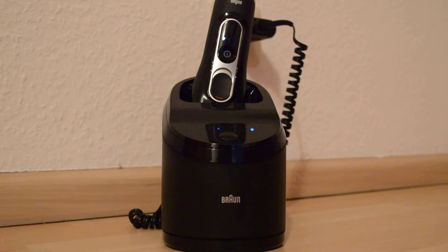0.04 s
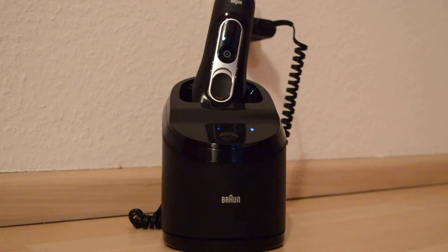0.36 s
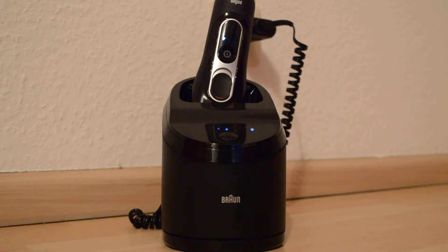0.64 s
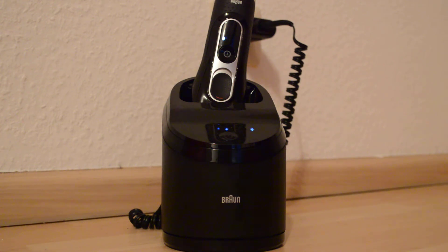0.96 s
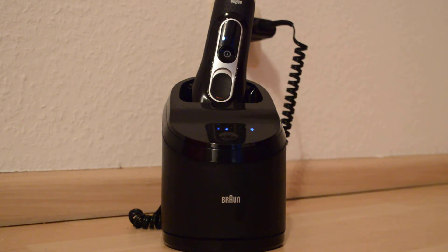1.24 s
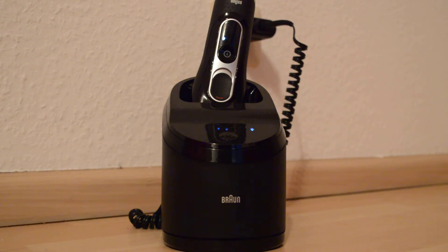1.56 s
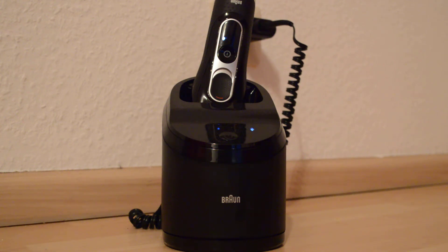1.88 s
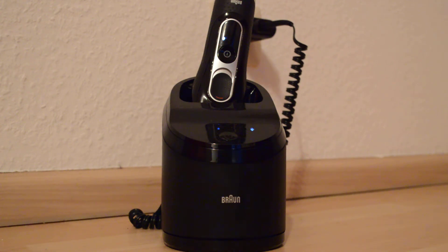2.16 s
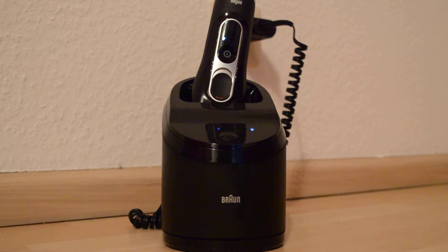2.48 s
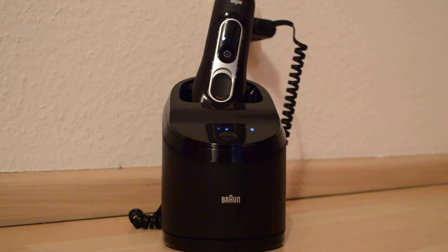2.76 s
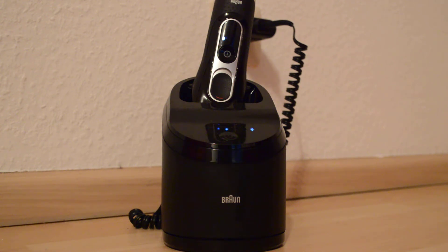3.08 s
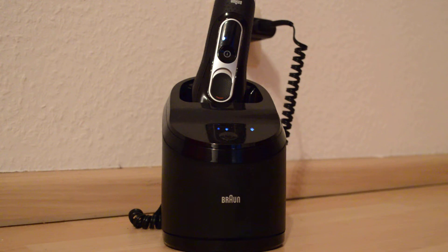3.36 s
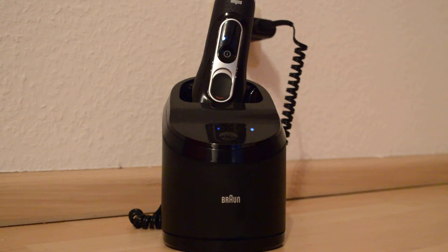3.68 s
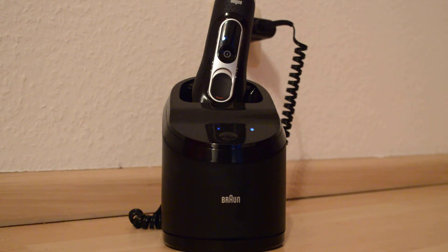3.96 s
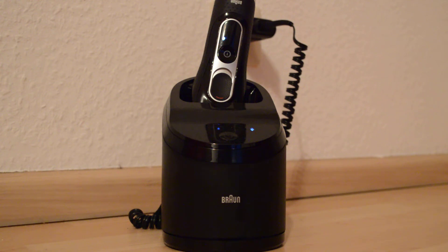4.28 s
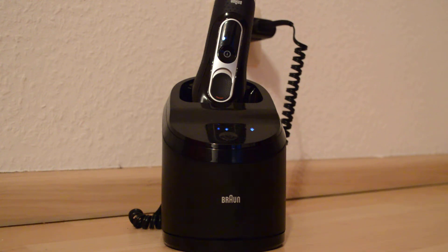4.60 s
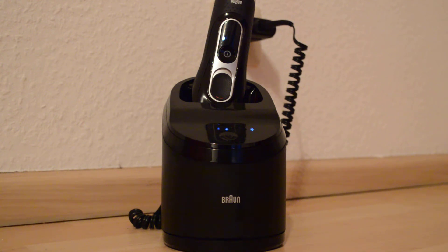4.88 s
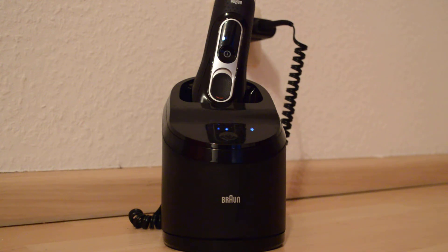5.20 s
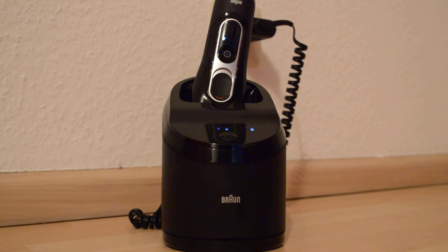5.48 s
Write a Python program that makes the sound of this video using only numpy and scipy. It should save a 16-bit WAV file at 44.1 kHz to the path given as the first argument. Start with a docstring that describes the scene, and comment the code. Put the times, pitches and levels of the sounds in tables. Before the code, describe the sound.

An electric shaver buzzes loudly in its cleaning station, with a raspy, hissing edge and a little churning fluid. After about two seconds it switches off with a brief rattle and a short ring from the housing. The station's pump carries on much more quietly, a steady hum with a fine high bearing squeak and a thin electronic whine. A faint low room rumble lies underneath.

```python
"""An electric shaver buzzes in its cleaning station on a wooden floor. Its cutter, stroking 127 times
a second, drives the housing into forced vibration, scrapes the foil and churns the fluid.
Switched off, it rattles to rest and the housing rings briefly. The station's pump, running throughout,
hums on with a squeaking bearing and a thin electronic whine, over the low rumble of the room."""
import sys
import numpy as np
from scipy.fft import rfft, irfft, next_fast_len
from scipy.io import wavfile
from scipy.ndimage import uniform_filter1d, map_coordinates

SR = 44100
rng = np.random.default_rng(int(sys.argv[2]) if len(sys.argv) > 2 else 0)


def materialize(psi):
    """Save the field psi as 16-bit PCM at rate SR to the path in sys.argv[1].

    A 1-D psi becomes a single channel; in a 2-D psi each row is a channel.
    """
    bounded = np.clip(np.atleast_2d(psi).T, -1, 1)
    quanta = np.round(bounded * 32767).astype(np.int16)
    wavfile.write(sys.argv[1], SR, quanta)


N = 244314
OFF_S = 2.236  # the shaver's power is cut
FREE_HZ, LOADED_HZ = 127.6, 126.8  # stroke rate without drag and under full drag
TOP_HZ = 15760  # upper band limit


def shaver():
    """Periodic excitation: one stroke cycle, slowed by drag, times all the sounds of the cutter."""
    load = fluid_drag()
    stroke_hz = FREE_HZ + (LOADED_HZ - FREE_HZ) * load
    turns = np.cumsum(stroke_hz) / SR
    body = housing_buzz(turns, load) + head_rasp(turns, load) + fluid_churn(turns, load)
    treble = foil(turns, load, np.mean(stroke_hz))
    return body * switch_off(t60=0.62, echo_db=-6.5) + treble * switch_off(t60=0.29, echo_db=-2.5)


def fluid_drag(first_load=0.6, build_s=0.908):
    """Fluid resistance loads the cutter, from 0 (free) to 1 (full drag)."""
    # The cutter runs nearly free. Each row: start in seconds, length in seconds, share of drag lost.
    slacks = [(-0.1, 0.19, 0.62), (0.295, 0.42, 0.82), (2.01, 0.5, 0.871)]
    slack, = swells(slacks, ramp_s=0.0989)
    build_up = np.interp(clock(), [0, build_s], [first_load, 1])
    return np.clip(build_up * (1 - slack), 0, 1)


def housing_buzz(turns, load, free_db=-27, drag_gain_db=2):
    """Forced vibration: the housing sounds harmonics of the stroke rate, whose balance shifts with drag."""
    # Spectra under light and heavy drag. Each row: harmonic number, relative level in dB.
    light_harmonics = [(1, -17), (2, -17), (3, -20), (4, -8), (5, -10), (6, -26), (7, -9), (8, -8), (9, -3),
                       (10, -7), (11, -16), (12, -10), (13, -15), (14, -8), (15, -5), (16, -18), (17, 0),
                       (18, -11), (19, -7), (20, -5), (21, -19), (22, -11), (23, -18), (24, -22), (25, -22),
                       (26, -22), (27, -22), (28, -22), (29, -20)]
    heavy_harmonics = [(1, -20), (2, -23), (3, -21), (4, -14), (5, -11), (6, -25), (7, -5), (8, -2),
                       (9, -10), (10, -14), (11, -12), (12, -16), (13, -21), (14, -15), (15, -10),
                       (16, -25), (17, 0.7), (18, -14), (19, -9), (20, -12), (21, -17), (22, -16),
                       (23, -21), (24, -17), (25, -17), (26, -23), (27, -24), (28, -28), (29, -20)]
    heavy_share = np.interp(load, [0.23, 0.76], [0, 1])
    unsteady_turns = turns + 0.00084 * wobble(82)
    tone = np.zeros(N)
    for (order, light_db), (_, heavy_db) in zip(light_harmonics, heavy_harmonics):
        level_db = light_db + heavy_share * (heavy_db - light_db) + 0.93 * wobble(5)
        tone += amp(level_db) * np.sin(2 * np.pi * (order * unsteady_turns + rng.random()))
    running_rms = np.sqrt(np.abs(uniform_filter1d(tone ** 2, SR // 10)))
    return amp(free_db + drag_gain_db * load) * tone / running_rms


def head_rasp(turns, load):
    """Amplitude modulation: the noise of the head and the sloshing fluid pulses twice a stroke."""
    # The rasp's spectrum. Each row: frequency in Hz, relative spectral density in dB.
    rasp_spectrum = [(1200, -33), (1700, -6), (2000, -12.5), (2330, 1), (2600, -1.5), (2900, -10),
                     (3700, -17.5), (6000, -40)]
    level_db = -36.5 - 0.9 * load + 1.5 * wobble(7.6)
    return amp(level_db) * noise(rasp_spectrum, 1 + 0.11 * np.cos(4 * np.pi * turns))


def fluid_churn(turns, load):
    """Flow noise: the cutter stirs the fluid in one uneven pulse a stroke."""
    # The churning's spectrum. Each row: frequency in Hz, relative spectral density in dB.
    churn_spectrum = [(100, -43), (300, -18.5), (700, -13), (1050, -6.5), (1250, -6.5), (1420, 1.5),
                      (1650, -16.5), (2200, -19), (4000, -41)]
    # The fluid surges and ebbs. Each row: start in seconds, length in seconds, level change in dB.
    surges = [(0.37, 0.28, 2), (1.26, 0.21, -1), (1.56, 0.27, -1.5)]
    surge_db, = swells(surges, ramp_s=0.041)
    pulses = (1 + 0.22 * np.sin(2 * np.pi * turns)) * amp(2.2 * wobble(30.25))
    return amp(-39 - 0.4 * load + surge_db) * noise(churn_spectrum, pulses)


def foil(turns, load, stroke_hz):
    """Friction and resonance: scraped on both halves of a stroke, the foil hisses, buzzes and rings."""
    # Overtones nearest the foil's resonances. Each row: frequency in Hz, relative level in dB.
    resonances = [(4694, -54), (4818, -58.5), (5200, -60), (5453, -62), (5959, -81), (6212, -51.5),
                  (6342, -51), (6465, -49), (6718, -55.5), (6848, -63), (6971, -52), (7607, -50),
                  (7989, -51), (8242, -52), (8877, -52.5), (10271, -54)]
    # Spectra of the contact buzz and the hiss. Each row: frequency in Hz, relative density in dB.
    contact_spectrum = [(3900, 2), (4300, -3.5), (5200, -1.5), (6300, -1), (8000, -11), (9500, -6),
                        (10300, -2.5), (11500, -22), (13000, -20), (15500, -43)]
    hiss_spectrum = [(2500, -25), (3300, -10.5), (4500, -10.5), (5100, -9), (5900, -4.5), (7200, -8),
                     (8200, -6.5), (9600, -10.5), (10400, -8.5), (11500, -12.5), (13000, -24), (15500, -44)]
    hiss_db = -39 - 0.87 * load
    ring_hz, ring_db = np.transpose(resonances)
    ring = cycle(turns + 0.00053 * wobble(51), ring_hz / LOADED_HZ, ring_db, rng.random(len(ring_hz)))
    ringing = amp(hiss_db - 10.5 + 6.4 * load + 2.3 * wobble(10.05)) * ring
    buzz = amp(hiss_db - 2) * comb(turns, stroke_hz, contact_spectrum, jitter_turns=0.001, jitter_rate=40)
    scrape = 1 + 0.4 * np.cos(4 * np.pi * turns) + 0.3 * np.cos(2 * np.pi * turns)
    hiss = amp(hiss_db) * noise(hiss_spectrum, scrape * amp(0.9 * wobble(150)))
    return ringing + buzz + hiss


def spurt(at_s=0.15, level_db=-39, t60=0.22, attack_s=0.004):
    """A noise transient: a little fluid spits through the foil."""
    t = time_since(at_s)
    spray = noise([(5500, -29), (7000, 0), (8300, 0), (10000, -25)])
    return amp(level_db - 60 * t / t60) * (1 - np.exp(-t / attack_s)) * spray


def switch_off(t60, echo_db):
    """Reverberant decay: once power is cut, the direct sound ends and the room's share dies away."""
    t = time_since(OFF_S)
    echo = amp(echo_db)
    return (1 - echo) * np.exp(-t / 0.0035) + echo * amp(-60 * t / t60)


def coasting(level_db=-30, slowing_s=0.193, t60=0.62, knock_t60=0.071):
    """Damped motion: without power the cutter knocks and rattles ever more slowly and softly."""
    # The rattle's spectrum. Each row: frequency in Hz, relative spectral density in dB.
    rattle_spectrum = [(80, -25), (200, -4), (300, 4), (500, -10), (950, 3), (1400, 2.5), (1800, -6),
                       (2300, -0.5), (3300, -11.5), (10000, -20), (14000, -42)]
    # The cutter's last knocks. Each row: start in seconds, level in dB.
    last_knocks = [(2.243, -30), (2.281, -38)]
    t = time_since(OFF_S)
    turns = FREE_HZ * slowing_s * (1 - np.exp(-t / slowing_s))
    pulses = 1 + 0.12 * np.cos(2 * np.pi * turns)
    rattle = amp(level_db - 60 * t / t60) * (1 - np.exp(-t / 0.01)) * pulses
    knocks = sum(amp(db - 60 * time_since(at_s) / knock_t60) * (clock() > at_s)
                 for at_s, db in last_knocks)
    return (rattle + knocks) * noise(rattle_spectrum)


def housing_ring(attack_s=0.006, waver_rad=0.58):
    """Free vibration: the jolt of the stop excites the housing's modes, which decay exponentially."""
    # Each row: frequency in Hz, level in dB, time to fall by 60 dB in seconds.
    modes = [(891, -36, 0.29), (1023, -41.5, 0.25), (2190, -36, 0.35), (2275, -38.5, 0.42)]
    t = time_since(OFF_S)
    ring = np.zeros(N)
    for hz, db, t60 in modes:
        phase = 2 * np.pi * (hz * t + rng.random()) + waver_rad * wobble(40)
        ring += amp(db - 60 * t / t60) * unit(np.sin(phase))
    return ring * (1 - np.exp(-t / attack_s))


def pump(rotation_hz=84.85, hum_db=-43, wash_db=-50.3):
    """Rotating machinery: the motor hums at harmonics of its speed; fluid washes through twice a turn."""
    # The motor's hum. Each row: harmonic number, relative level in dB.
    hum_harmonics = [(1, -8.5), (2, -7), (3, -10), (4, -20), (5, -12), (6, 0), (7, -12.5), (8, -22),
                     (9, -10.5), (10, -0.5), (11, -14), (12, 4), (13, -42), (14, -15.5), (15, -14),
                     (16, -8), (17, -13.5), (18, 3), (19, -9.5), (20, -5.5), (21, 0), (22, -5.5), (23, -13),
                     (24, -3.5), (25, -15.5), (26, -6), (27, -12), (28, -9), (29, -17), (30, -3.5),
                     (31, -7), (32, -12.5), (33, -5), (34, -13), (35, -18), (36, -9.5)]
    # The flow's spectrum. Each row: frequency in Hz, relative spectral density in dB.
    wash_spectrum = [(120, -25), (220, 0), (1100, 0), (1400, -3), (1900, 0), (2400, -6), (4400, -8),
                     (5200, -13), (7000, -15), (11000, -13), (13000, -19), (15500, -20)]
    turns = np.cumsum(rotation_hz * (1 + 0.00034 * wobble(10))) / SR
    orders, levels_db = np.transpose(hum_harmonics)
    hum_gain = amp(hum_db + 0.46 * wobble(12))
    hum = hum_gain * cycle(turns + 0.0011 * wobble(60), orders, levels_db, rng.random(len(orders)))
    brushes = brush_buzz(turns, rotation_hz)
    wash = amp(wash_db) * noise(wash_spectrum, 1 + 0.3 * np.cos(4 * np.pi * turns))
    return hum + brushes + wash + bearing_squeak(turns)


def brush_buzz(turns, rotation_hz, level_db=-49.5):
    """Sliding contact: the motor's brushes buzz, pressing harder on one side of each turn."""
    # The brushes' spectrum. Each row: frequency in Hz, relative spectral density in dB.
    brush_spectrum = [(3100, -3.5), (3400, -3), (4700, 2.5), (5100, -7.5), (5500, -5.5), (6400, -6),
                      (7400, -11), (7950, -1.5), (8300, -15), (9100, 3), (9500, -11), (10400, -4),
                      (11800, -9.5), (12900, -23), (13600, -15), (14100, -27), (15500, -32)]
    pressure = 1 + 0.25 * np.cos(2 * np.pi * turns) + 0.027 * np.sin(4 * np.pi * turns)
    contacts = comb(turns, rotation_hz, brush_spectrum, jitter_turns=0.0006, jitter_rate=30)
    return amp(level_db + 0.72 * wobble(20)) * unit(pressure * contacts)


def bearing_squeak(turns, level_db=-49.5, harmonic=51, steady_drag=0.76, ease_from_s=4.2, ease_db_per_s=3):
    """Friction-excited tone: a bearing rubs once a turn, and grows grittier the harder it rubs."""
    # It rubs harder or runs free. Each row: start in seconds, length in seconds, level change in dB.
    rubs = [(3.88, 0.11, 1.5), (4.74, 0.25, -3), (4.93, 0.1, 3)]
    rub_db, = swells(rubs, ramp_s=0.04)
    rise_db = np.interp(clock(), [OFF_S, OFF_S + 0.17], [-3.5, 0])  # comes up once the shaver is off
    swell_db = rise_db - ease_db_per_s * time_since(ease_from_s) + rub_db + 0.9 * wobble(9)
    turns_from_rub = (turns + 0.03 * wobble(25)) % 1 - 0.5
    pulse = np.exp(-0.5 * (turns_from_rub / 0.08) ** 2)
    friction = steady_drag + pulse * amp(swell_db + 2.5 * wobble(14))
    bend_rad = 0.12 * np.cos(2 * np.pi * turns_from_rub) + 0.5 * wobble(30)  # pitch bends in each rub
    tone = np.sin(2 * np.pi * harmonic * turns + bend_rad)
    return amp(level_db + swell_db) * unit(friction * tone)


def whine():
    """Nearly pure tones: the electronics whine, wavering slightly in level and phase."""
    # Each row: frequency in Hz, level in dB.
    tones = [(5743, -46.5), (5488, -64), (5997, -65), (15677, -65.5)]
    t = clock()
    return sum(amp(db + 0.34 * wobble(8)) * unit(np.sin(2 * np.pi * hz * t + 0.1 * wobble(6.1)))
               for hz, db in tones)


def room(rumble_db=-52.5, drone_db=-53):
    """Ambient noise: two low bands, a rumble and a hollow drone, swell and sink."""
    # Spectra of the two bands. Each row: frequency in Hz, relative spectral density in dB.
    rumble_spectrum = [(20, -45), (28, -24), (38, 0.5), (60, 2), (85, 3.3), (105, -5), (140, -14),
                       (300, -62)]
    drone_spectrum = [(70, -40), (110, -15), (132, 4.5), (148, 0.5), (165, -2.5), (195, -8.5), (330, -20),
                      (600, -34)]
    # Each row: start in seconds, length in seconds, rumble change in dB, drone change in dB.
    room_swells = [(3.15, 0.75, 4.5, 2.5), (3.9, 1.0, -1.5, 3.5)]
    rumble_swell_db, drone_swell_db = swells(room_swells, ramp_s=0.12)
    rumble_gain = amp(rumble_db + rumble_swell_db + 1.2 * wobble(4))
    drone_gain = amp(drone_db + drone_swell_db + 0.8 * wobble(4))
    return rumble_gain * noise(rumble_spectrum) + drone_gain * noise(drone_spectrum)


def comb(turns, rate_hz, spectrum, jitter_turns, jitter_rate, contacts=4):
    """Superposition: contacts with separate timing jitter share out the high harmonics; rms 1."""
    orders = np.arange(np.ceil(spectrum[0][0] / rate_hz), TOP_HZ // rate_hz)
    total = np.zeros(N)
    for contact in range(contacts):
        own_orders = orders[contact::contacts]
        uneven_db, phases = rng.uniform((-4, 0), (4, 1), (64, 2))[:len(own_orders)].T
        levels_db = along(spectrum, own_orders * rate_hz) + uneven_db
        total += cycle(turns + jitter_turns * wobble(jitter_rate), own_orders, levels_db, phases)
    return unit(total)


def cycle(turns, orders, levels_db, phases, size=8192):
    """Fourier synthesis: a waveform of rms 1 with these harmonics, repeated once a turn."""
    bins = np.zeros(size // 2 + 1, complex)
    bins[np.round(orders).astype(int)] = amp(levels_db) * np.exp(2j * np.pi * phases)
    period = np.resize(unit(irfft(bins)), size + 1)
    return np.interp(turns % 1 * size, np.arange(size + 1), period)


def noise(spectrum, envelope=1):
    """Subtractive synthesis: white noise, modulated and then filtered to a spectrum; rms 1."""
    return unit(filtered(envelope * rng.standard_normal(N), lambda hz: amp(along(spectrum, hz))))


def filtered(x, response):
    """Linear filtering: the spectrum of x is multiplied by a frequency response."""
    size = next_fast_len(N + SR // 4)
    return irfft(rfft(x, size) * response(np.fft.rfftfreq(size, 1 / SR)), size)[:N]


def swells(rows, ramp_s):
    """Trapezoidal envelopes from (start, length, size, ..) rows; one curve for each size column."""
    t = clock()
    return sum(np.outer(sizes, np.clip(np.minimum(t - start, start + length - t) / ramp_s, 0, 1))
               for start, length, *sizes in rows)


def wobble(rate):
    """Random modulation: a smooth curve through rate knots a second."""
    coarse = np.arange(0, N + 32, 32)
    knots = rng.standard_normal(4096)
    return np.interp(np.arange(N), coarse, map_coordinates(knots, [coarse * rate / SR], mode="wrap"))


def along(points, hz):
    """Interpolation of (Hz, dB) points on a logarithmic frequency axis."""
    point_hz, point_db = np.transpose(points)
    return np.interp(np.log(hz + 1), np.log(point_hz + 1), point_db)


def amp(db):
    """Decibels to amplitude ratio."""
    return 10 ** (np.asarray(db) / 20)


def unit(x):
    """Normalisation to rms 1."""
    return x / np.sqrt(np.mean(x ** 2) + 1e-20)


def clock():
    """The time of each sample in seconds."""
    return np.arange(N) / SR


def time_since(start_s):
    """Seconds since start_s, zero before it."""
    return np.maximum(clock() - start_s, 0)


def scene():
    """Superposition: shaver, station and room add at one listening point."""
    return (shaver() + spurt() + coasting() + housing_ring() + pump() + whine() + room())[None]


def record(dry):
    """Band limiting: an ideal low-pass filter removes everything above TOP_HZ."""
    return filtered(dry[0], lambda hz: hz < TOP_HZ)[None]


dry = scene()
out = record(dry)
materialize(out)
```